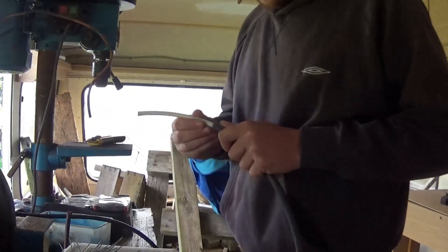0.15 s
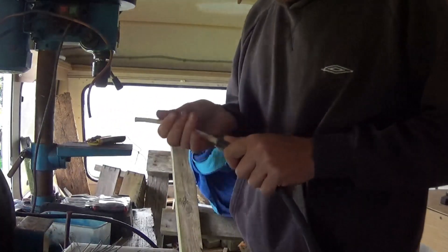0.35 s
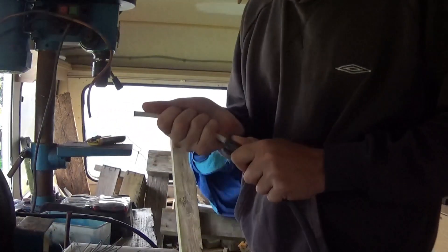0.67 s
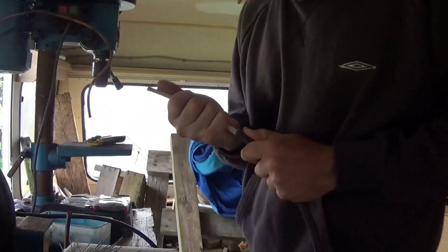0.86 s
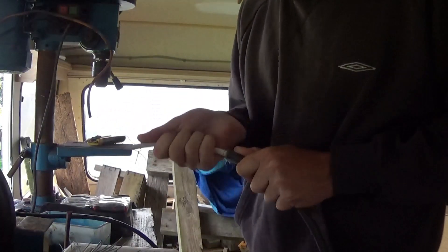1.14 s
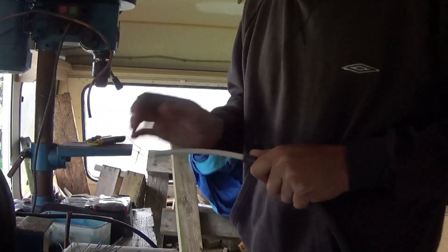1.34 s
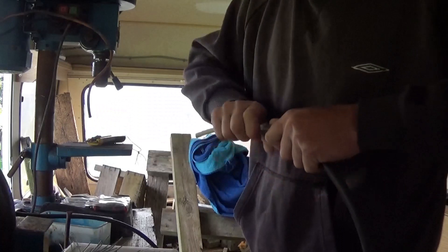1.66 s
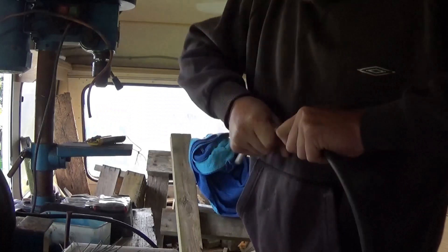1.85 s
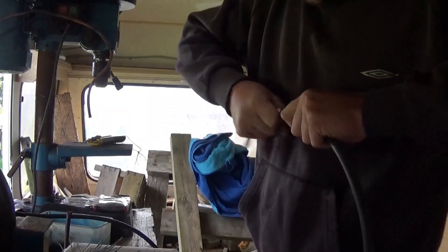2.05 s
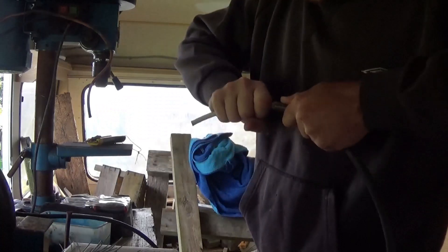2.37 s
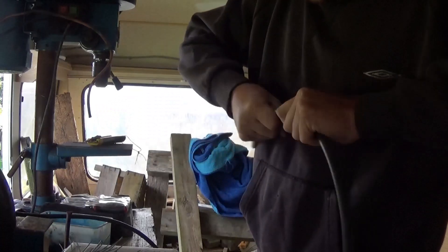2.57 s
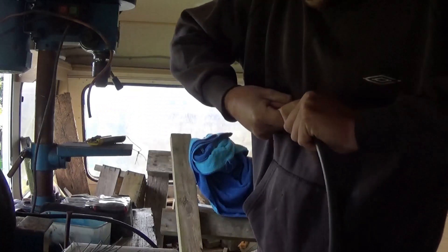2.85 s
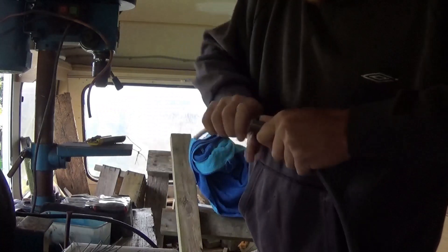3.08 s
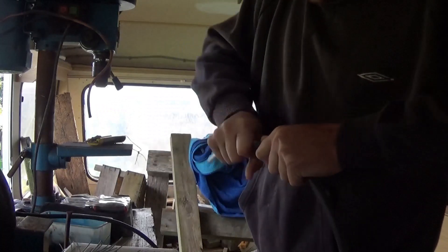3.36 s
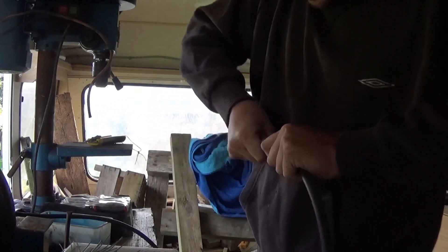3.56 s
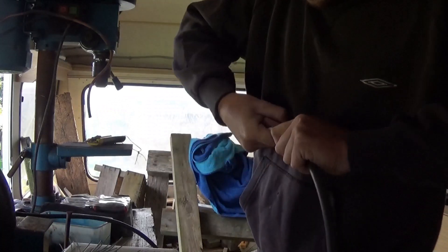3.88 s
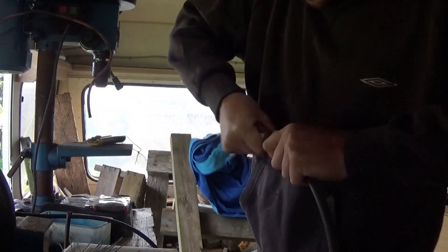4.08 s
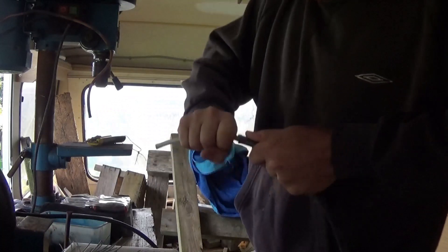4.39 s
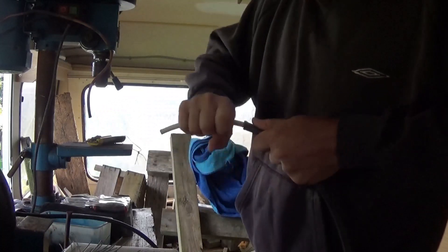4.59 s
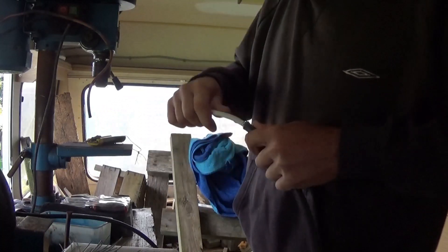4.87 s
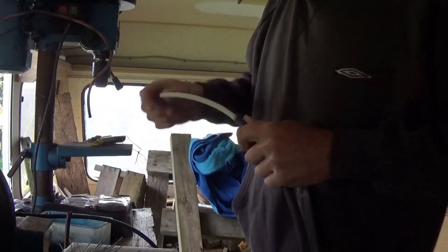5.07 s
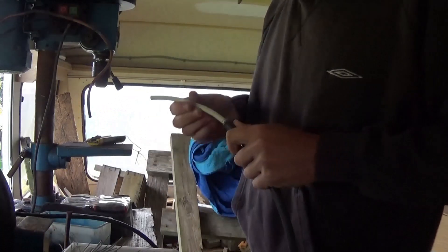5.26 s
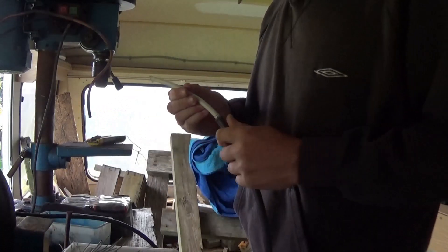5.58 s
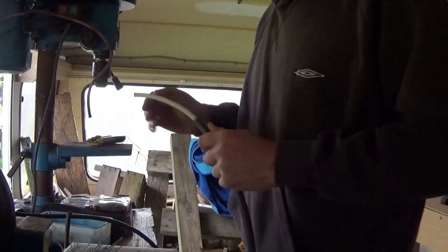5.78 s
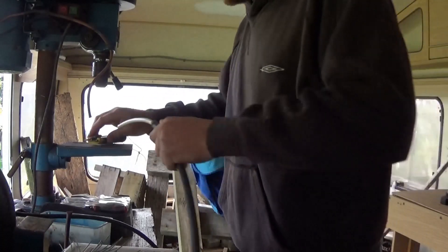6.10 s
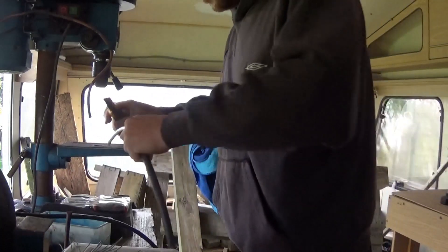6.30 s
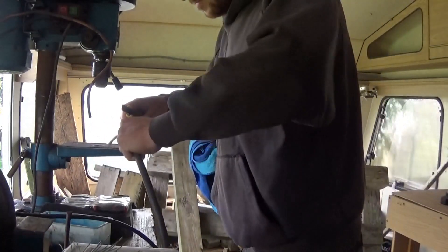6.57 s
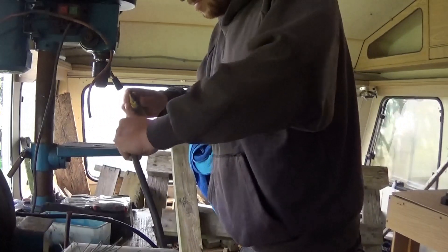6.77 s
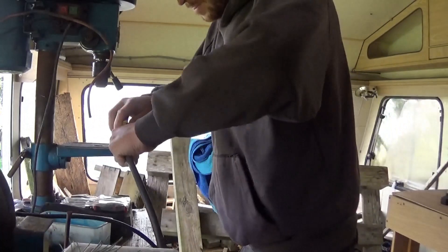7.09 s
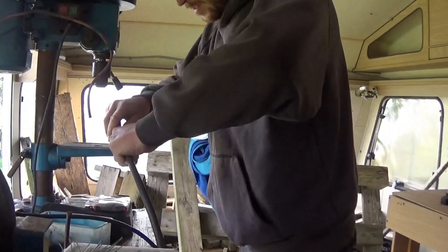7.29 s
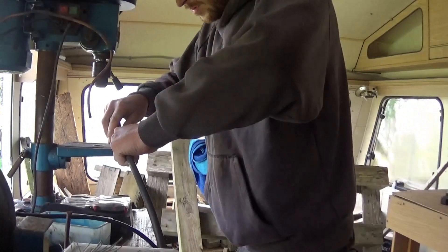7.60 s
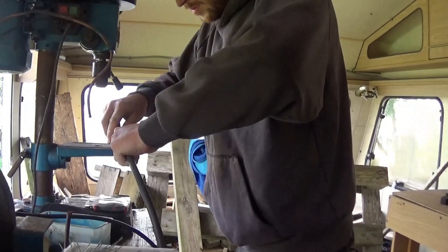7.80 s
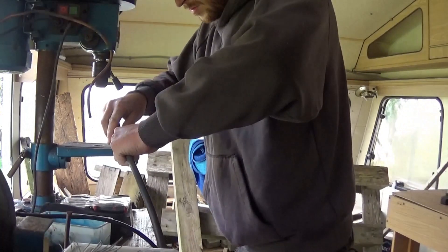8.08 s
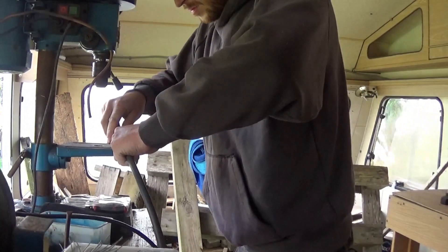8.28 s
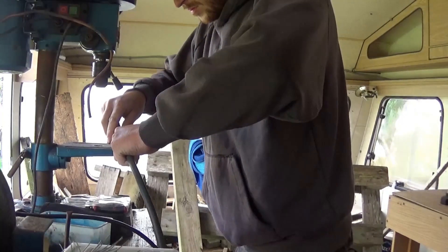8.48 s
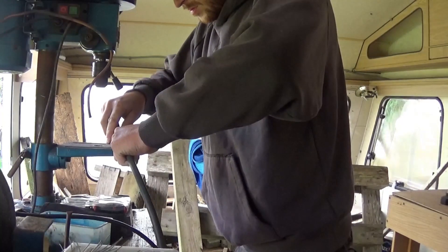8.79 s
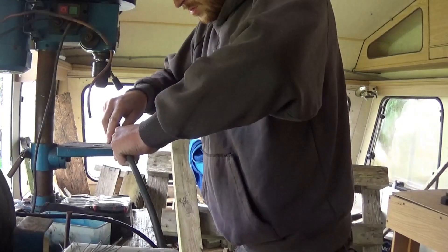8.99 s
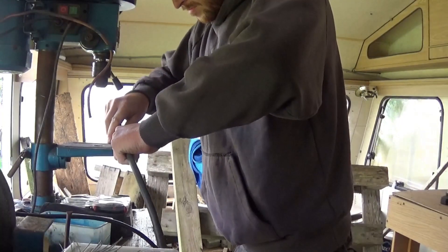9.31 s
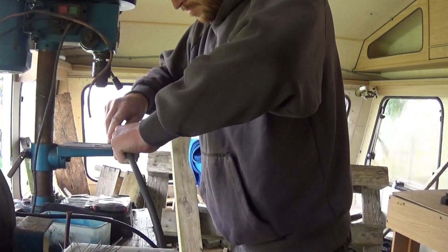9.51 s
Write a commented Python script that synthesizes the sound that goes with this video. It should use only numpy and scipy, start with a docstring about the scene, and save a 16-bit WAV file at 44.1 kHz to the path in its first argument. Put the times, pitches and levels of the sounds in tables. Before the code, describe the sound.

Close dry ratchet clicks, plastic ticks and cloth rustle, woody knocks, a metal tool scraping off a steel table, then sparse scratchy clicks and buzzy chips.

```python
"""Stiff cable worked by hand in a small wooden cabin.

A blade slider ratchets; the sheath ticks and snaps; sleeves and fingers rub; the cable drags over and slaps
the woodwork; a steel tool slides off a machine table; scratchy clicks ring, some around the tool's stutter,
later ones like a nail on the cable end. Contacts are impulses and noise through resonances, friction is
gritty noise. Through the open door come a buzzing small bird and a dove (swept sines), a far engine (two
sines) and outdoor hush (noise)."""
import sys
import numpy as np
from scipy import signal
from scipy.fft import rfft, irfft, next_fast_len
from scipy.io import wavfile
from scipy.ndimage import map_coordinates

SR = 44100
rng = np.random.default_rng(int(sys.argv[2]) if len(sys.argv) > 2 else 0)


def linear_from_db(decibels):
    """Turn decibels (scalar or array-like) into linear amplitude factors; 0 gives 1."""
    return 10 ** (np.asarray(decibels, float) / 20)


def put_to_file(sound):
    """Save the sound as 16-bit audio at rate SR, in the file named by the first command-line argument."""
    columns = np.atleast_2d(sound).T  # one column per channel
    safe = np.clip(columns, -1, 1)
    whole_steps = np.round(safe * 32767)
    wavfile.write(sys.argv[1], SR, whole_steps.astype(np.int16))


N = 425565
T = np.arange(N) / SR


def unit(x):
    """Scales to rms 1."""
    return x / np.sqrt(np.mean(x ** 2) + 1e-20)


def along(points, hz):
    """Interpolates (Hz, value) points on a log-frequency axis."""
    f, v = np.transpose(points)
    return np.interp(np.log(hz + 1), np.log(f + 1), v)


def curves(rows):
    """Interpolates each column after the time to one value per sample."""
    s, *cols = np.transpose(rows)
    return [np.interp(T, s, c) for c in cols]


def wobble(rate):
    """Smooth random curve, rate knots per second."""
    return map_coordinates(rng.standard_normal(int(N * rate / SR) + 4), [T * rate])


def filtered(x, response):
    """Applies a complex frequency response."""
    m = next_fast_len(x.shape[-1] + 8192)
    spectrum = rfft(x, m) * response(np.fft.rfftfreq(m, 1 / SR))
    return irfft(spectrum, m)[..., :x.shape[-1]]


def body(modes):
    """Causal response of (Hz, width Hz, dB) resonances summed with alternating sign."""
    def response(f):
        return sum((-1) ** k * linear_from_db(db) * 1j * f * w / (c * c - f * f + 1j * f * w)
                   for k, (c, w, db) in enumerate(modes))
    return response


def add(track, s, sound, db):
    """Lays a sound on a track at a given peak level."""
    part = track[..., round(s * SR):][..., :len(sound)]
    part += linear_from_db(db) * (sound / np.abs(sound).max())[:part.shape[-1]]


def gritty(rate, depth_db):
    """Noise whose size jumps about within bounds, as surfaces catch and let go."""
    return unit(rng.standard_normal(N) * linear_from_db(depth_db * np.clip(wobble(rate), -2, 2)))


def crackle(per_s, spread_db):
    """Sparse grains of uneven size."""
    present = rng.random(N) < per_s / SR
    size = linear_from_db(spread_db * np.minimum(rng.exponential(size=N), 2.5))
    return unit(present * size * rng.standard_normal(N))


def strokes(rows):
    """Gain of strokes that climb 10 dB per rise time and drop 10 dB per fall time; powers add."""
    power = sum(linear_from_db(2 * db - 20 * np.maximum((s - T) / rise, (T - s) / fall)) for s, rise, fall, db in rows)
    return np.sqrt(power)


def wide(pair, spread):
    """Mixes two unrelated sounds towards the left-right likeness of diffuse sound."""
    # (frequency [Hz], left-right likeness at spread 1 [-1..1])
    likeness = [(60, 0.95), (330, 0.89), (810, 0.36), (2990, 0.057), (11000, 0.59)]

    def split(hz):
        angle = spread * np.arccos(np.clip(along(likeness, hz), -1, 1)) / 2
        return np.array([np.cos(angle), np.sin(angle)])
    mid, side = filtered(pair, split)
    return np.array([mid + side, mid - side])


def ratchet():
    """Slider jumps tooth by tooth, slower and slower; each tooth snaps and rattles the housing."""
    # slider housing resonances: (frequency [Hz], width [Hz], level [dB])
    housing = [(480, 520, -4), (1120, 490, 1.5), (1950, 460, 2), (2640, 950, 4.5), (3240, 960, 3),
               (5840, 510, -6), (8640, 1340, -8.5)]
    # housing boom as the slider frees: (frequency [Hz], width [Hz], level [dB])
    boom = [(1114, 47, 0)]
    # slider breaks free: (time [s])
    latch_s = (0.0618, 0.0651)
    # single teeth: (time [s])
    single_s = [0.1487, 0.168, 0.197, 0.2276, 0.2712, 0.3159, 0.3776, 0.4674]
    latch_db, first_tooth_db, tire_db_per_s = -16.5, -16.5, 7
    whirr_last_gap_s, whirr_shrink, whirr_db = 0.01, 0.88, -23  # shrink: each earlier gap against the next
    wall_s, wall_db = 0.0042, -3  # a near surface repeats each tooth

    out, t = np.zeros(N), T[:1500]
    uneven = rng.standard_normal((12, 2))
    whirr_s = single_s[0] - np.cumsum(whirr_last_gap_s * whirr_shrink ** np.arange(len(uneven)))
    teeth = [(s, latch_db) for s in latch_s]
    teeth += [(s + 0.0005 * a, whirr_db + 0.54 * b) for s, (a, b) in zip(whirr_s, uneven)]
    teeth += [(s, first_tooth_db - tire_db_per_s * (s - single_s[0])) for s in single_s]
    for s, db in teeth:
        blow = (t == 0) + 0.11 * rng.standard_normal(len(t)) * linear_from_db(-60 * t / 0.019)
        blow = blow + linear_from_db(wall_db) * np.roll(blow, round(wall_s * SR))
        add(out, s, filtered(blow, body(housing)), db)
    add(out, latch_s[0], filtered(1. * (t == 0), body(boom)), -18)
    return out


def ticks():
    """Short contacts ring the sheath, each at its own balance; louder ones have shorter blows."""
    # contacts: (time [s], treble level [dB], body against treble [dB], top against treble [dB])
    contacts = [(0.7586, -37, -9, -5), (0.846, -37, -11, -7), (0.873, -40.5, -11, -5),
                (0.955, -41.5, -11.5, -3), (1.572, -35, -14.5, -8), (1.643, -39, -36, -6),
                (2.0503, -39, -0.5, 4.5), (2.246, -45, -5.5, -12), (2.3007, -36.5, -9, -9),
                (2.3428, -36.5, -14, -6.5), (3.452, -29.5, -21.5, -9.5), (3.528, -17, -11, -2),
                (3.6802, -43, -4, -18), (3.917, -40.5, -9, -1), (4.356, -38, -9, -7),
                (4.3903, -38, -14, -10), (4.462, -45, -3, -11), (4.497, -41.5, -8, -3.5),
                (4.573, -39, -7, 1), (5.073, -42.5, -12, 0.5), (5.4602, -46.5, -2, 3),
                (5.506, -42.5, -5, -2.5), (5.6567, -45.5, -9, 1.5), (5.8086, -39.5, -11, -1.5),
                (2.7636, -47, -2, 2), (2.866, -46, -8, 2.5), (2.9231, -52, -22, 7),
                (7.0798, -31, -4.5, -7.5), (3.517, -40, -26, 1)]
    # sheath resonances before each contact's balance: (frequency [Hz], width [Hz], level [dB])
    sheath = [(1700, 500, 7), (2850, 600, 7), (4450, 1100, 4), (5800, 1300, -1), (7200, 1300, 1),
              (8700, 1500, 5), (10200, 1400, 3)]
    lowest_db = -6  # lowest resonance against the rest of the body
    ring_db, crack_db = -2.5, 4

    out, t = np.zeros(N), T[:3000]
    for s, db, body_db, top_db in contacts:
        balance = np.array([body_db + lowest_db, body_db, body_db / 2, 0, 0, top_db, top_db])
        mode_db = balance + np.transpose(sheath)[2]
        peak_db = db + mode_db.max()
        u = t / (0.0034 * linear_from_db(-0.25 * (peak_db + 46)))
        blow = rng.standard_normal(len(t)) * u ** 1.15 * np.exp(-u)
        modes = [(c * (1 + rng.normal(0, 1 / 30)), w, d) for (c, w, _), d in zip(sheath, mode_db)]
        ring = filtered(blow, body(modes))
        ring = filtered(ring, body([(c, 2 * w, 0) for c, w, _ in modes]))  # steep skirts
        add(out, s, ring, peak_db + ring_db)
        crack = (t == 0) + 0.24 * rng.standard_normal(len(t)) * np.exp(-t / 0.0012)
        crack = filtered(crack, body([(c, 1.2 * w, d) for c, w, d in modes]))
        add(out, s, crack, peak_db + crack_db)
    return out


def handling():
    """Cloth rustles in the treble, skin scrapes on the sheath, the cable drags in jerks over the boards."""
    # rubs: (peak time [s], rise per 10 dB [s], fall per 10 dB [s], scrape [dB], rustle against scrape [dB])
    rubs = [(1.241, 0.034, 0.037, -57, 13), (1.95, 0.031, 0.093, -52.5, 3.5), (2.059, 0.037, 0.015, -48, 5),
            (2.528, 0.058, 0.02, -52, -1), (2.8, 0.17, 0.16, -45, -5), (4.57, 0.27, 0.14, -55.5, -5),
            (4.76, 0.24, 0.016, -59.5, 8.5), (5.06, 0.22, 0.11, -57.5, 2.5), (5.6, 1, 0.98, -61, -2.5),
            (6.14, 0.091, 0.25, -52.5, 2.5), (6.42, 0.1, 0.081, -39.5, -6.5),
            (6.65, 0.067, 0.055, -38, -0.5), (7.03, 0.29, 0.3, -50, -1.5)]
    # cable jerks: (peak time [s], rise per 10 dB [s], fall per 10 dB [s], level [dB])
    jerks = [(2.0, 0.04, 0.083, -44), (2.06, 0.026, 0.033, -38.5), (2.55, 0.062, 0.029, -44.5),
             (2.68, 0.047, 0.042, -42.5), (2.78, 0.054, 0.011, -31), (2.87, 0.13, 0.031, -38.5),
             (3.1, .03, .04, -49.5), (3.22, 0.074, 0.012, -52), (6.54, 0.23, 0.094, -50),
             (6.73, .1, 0.036, -52), (6.86, 0.026, 0.048, -53.5), (7.12, 0.13, 0.13, -56.5)]
    # boards under the cable: (frequency [Hz], width [Hz], level [dB])
    boards = [(238, 34, 6.5), (360, 88, 0.5), (428.5, 12, 3), (553, 50, -2.5), (818, 60, -6.5),
              (1090, 92, -12)]
    # cloth spectrum: (frequency [Hz], relative density [dB per Hz])
    cloth = [(3000, -17), (5000, -9), (8500, 2), (11000, -6.5)]
    # skin spectrum: (frequency [Hz], relative density [dB per Hz])
    skin = [(60, -11), (500, -6.5), (1050, -5.5), (3000, -7.5), (4800, -11), (7000, -16)]

    rustle = gritty(400, depth_db=3.5) + linear_from_db(-28) * crackle(130, spread_db=15)
    rustle = unit(filtered(rustle, lambda f: linear_from_db(along(cloth, f))))
    scrape = gritty(300, depth_db=4.0) + linear_from_db(-16) * crackle(150, spread_db=-0.5)
    scrape = unit(filtered(scrape, lambda f: linear_from_db(along(skin, f))))
    thin_boards = lambda f: 1 / (1 + (150 / (f + 1)) ** 3)  # small boards radiate no deep bass
    drag = unit(filtered(gritty(45, depth_db=2.5), lambda f: thin_boards(f) * body(boards)(f)))
    rustle_gain = strokes([(s, rise, fall, db + over_db) for s, rise, fall, db, over_db in rubs])
    scrape_gain = strokes([row[:4] for row in rubs])
    return rustle_gain * rustle + scrape_gain * scrape + strokes(jerks) * drag


def slaps():
    """A blow on the wood travels as a bending wave over several paths: treble arrives first, bass later."""
    # slaps: (time [s], peak level [dB], hardness [dB])
    hits = [(3.017, -17, -5.5), (3.498, -35.5, -19), (4.143, -23, -13.5), (4.727, -25.5, -13),
            (6.155, -36.5, -56), (6.193, -19.5, -16), (6.444, -27.5, -10), (7.042, -34, -12),
            (7.088, -32, 3)]
    # wooden panels: (frequency [Hz], width [Hz], level [dB])
    panels = [(336, 106, -1.5), (656, 152, 2.5), (756, 400, 0), (1250, 460, -4), (1760, 670, -7.5),
              (2940, 9200, -23.5)]

    out, t = np.zeros(N), T[:6000]
    for s, db, hard_db in hits:
        blow = 9 * (t == 0) + rng.standard_normal(len(t)) * linear_from_db(-60 * (t / 0.052) ** 3)
        treble = [(700, 0), (2000, hard_db + 0.5), (5000, 1.5 * hard_db - 4)]

        def wood(f):
            highpass = 1j * f / (100 + 1j * f)
            bending_lag = np.exp(-2j * np.pi * 0.1027 * np.sqrt(f))
            return highpass * bending_lag * linear_from_db(along(treble, f)) * body(panels)(f)
        add(out, s, filtered(blow, wood), db)
    return out


def tool():
    """A steel tool clinks, stutters and slides on the machine table; soft touches leave upper modes quiet."""
    # clinks: (time [s], peak level [dB], hardness [dB per octave])
    clinks = [(6.108, -46, 12), (6.352, -29, -4), (6.41, -31, 2), (6.624, -38, 7), (6.839, -28, 1),
              (7.04, -36.5, 2)]
    # steel modes: (frequency [Hz], level before hardness [dB], t60 when struck [s])
    steel = [(1037, 12.5, 0.18), (1190, 6.5, 0.099), (1396, 8, 0.23), (2054, -0.5, 0.12), (2320, -9, 0.15),
             (3750, -7, 0.15), (5060, -4.5, 0.15)]
    # stutters of the dragged tool: (time [s])
    stutter_s = [6.333, 6.354, 6.3804, 6.3964, 6.408, 6.43, 6.448, 6.466, 6.481]
    # stutter resonances: (frequency [Hz], width [Hz], level [dB])
    stutter_modes = [(3120, 440, -1), (5820, 200, 5.5), (8900, 1900, -2)]
    # slides: (peak time [s], rise per 10 dB [s], fall per 10 dB [s], level [dB])
    slides = [(6.44, .1, 0.13, -43), (6.66, 0.044, 0.08, -47), (6.8, .1, .05, -67),
              (6.95, 0.094, 0.063, -50)]

    out, t = np.zeros(N), T[:SR // 2]
    for s, db, hard_db in clinks:
        ring = sum(linear_from_db(g + hard_db * np.log2(hz / steel[0][0]) - 60 * t / t60) * np.sin(2 * np.pi * hz * t)
                   for hz, g, t60 in steel)
        grain = np.abs(rng.standard_normal(300)) ** 3 * np.sign(rng.standard_normal(300))
        chatter = grain * linear_from_db(-60 * t[:300] / 0.031)  # scuffing contact
        add(out, s, signal.fftconvolve(ring, chatter), db)
    for s in stutter_s:
        burst = rng.standard_normal(600) * linear_from_db(-60 * t[:600] / 0.0067)
        add(out, s, filtered(burst, body(stutter_modes)), -26 + 2 * rng.standard_normal())
    sung = body([(hz, 1.9 / t60 + 12, g) for hz, g, t60 in steel])  # widths from decay, plus 12 Hz
    return out + strokes(slides) * unit(filtered(gritty(120, depth_db=2.5), sung))


def scratchy_clicks():
    """Noise bursts ring resonances: some around the tool's stutter, later ones like a nail on the cable end."""
    # clicks: (time [s], peak level [dB], treble [dB], lowest ring [Hz])
    clicks = [(6.308, -23, 2, 2510), (6.542, -29, -16, 2600), (6.811, -37.5, -24, 2580),
              (7.2183, -35, -21, 1440), (7.456, -37, 3.5, 1800), (7.7847, -36, -5, 1800),
              (8.3539, -18.5, 1, 1560), (8.7406, -32, -8.5, 1780), (9.189, -46, -3, 1500)]
    # upper rings: (frequency [Hz], width [Hz], level before treble [dB])
    upper = [(2980, 240, 7), (3730, 490, -2), (6230, 630, 0), (7440, 450, 6), (9800, 1400, -12.5)]

    out, t = np.zeros(N), T[:3000]
    for s, db, treble_db, low_hz in clicks:
        blow = rng.standard_normal(len(t)) * t * np.exp(-t / 0.003)
        modes = [(low_hz, 420, 3)] + [(c, w, d + treble_db * (c > 5000)) for c, w, d in upper]
        ring = filtered(blow, body(modes))
        add(out, s, filtered(ring, body([(c, 2 * w, 0) for c, w, _ in modes])), db)  # steep skirts
    return out


def bird():
    """Buzzy chip: a whistle rising to a ceiling, shaken in pitch and level a few hundred times a second."""
    # calls: (time, 8 ms after onset [s])
    calls = [0.547, 0.72, 0.922, 1.585, 2.452, 3.264, 3.712, 3.794, 3.957, 4.206, 4.535, 4.996, 5.444,
             5.875, 6.896, 7.181, 7.596, 7.905, 8.153, 8.492, 8.711, 8.795, 8.975, 9.135, 9.406]

    out, t = np.zeros(N), T[:4000]
    for s in calls:
        vary = rng.standard_normal(3)
        buzz = 2 * np.pi * 270 * (1 + 0.081 * vary[0]) * t + vary[1]
        dip_hz = (1300 * np.exp(-t / 0.0215) + 500) * (1 - np.sin(buzz)) / 2
        hz = 7250 - dip_hz - 500 * np.exp(-t / 0.00977)
        shape = (t / 0.016) ** 0.5 * np.exp(-(t / 0.019) ** 1.3) * (1 + 0.5 * np.sin(buzz))
        add(out, s - 0.008, shape * np.sin(2 * np.pi * np.cumsum(hz) / SR), -47 + vary[2])
    return out


def dove():
    """Soft coos: sines of gliding pitch and level."""
    # one list per coo: (time [s], frequency [Hz], relative level [dB])
    coos = [
        [(1.0, 515.2, -76), (1.216, 514, -70), (1.3, 507, -87)],
        [(1.68, 530, -82), (1.758, 519, -62.5), (2.0, 516, -64)],
    ]

    out = 0
    for coo in coos:
        hz, db = curves(coo)
        on = np.clip(np.minimum(T - coo[0][0], coo[-1][0] - T) / 0.04, 0, 1)
        out = out + on * linear_from_db(db + 3.5) * np.sin(2 * np.pi * np.cumsum(hz) / SR)
    return out


def engine():
    """Far engine: sines at the firing rate and its double, fading in."""
    # hum: (time [s], firing rate [Hz], relative first order [dB], relative second order [dB])
    hum = [(7.3, 81.6, -81, -67), (7.36, 81.7, -88, -80), (9.65, 82.3, -80, -83.5)]

    hz, first_db, second_db = curves(hum)
    phase = 2 * np.pi * np.cumsum(hz) / SR
    fade_in = np.clip((T - hum[0][0]) / 0.28, 0, 1)
    return fade_in * (linear_from_db(first_db + 15.5) * np.sin(phase) + linear_from_db(second_db + 4) * np.sin(2 * phase))


def air():
    """Outdoor hush and microphone hiss: wide shaped noise of slowly wavering level."""
    # spectrum: (frequency [Hz], relative density [dB per Hz])
    spectrum = [(15, -52), (25, -9), (94, -6.5), (545, -3.5), (668, 2), (740, -3), (3680, -6), (4750, -10),
                (6960, -8), (11000, -12.5), (14300, -122), (22000, -120)]
    # mean level: (time [s], level [dB])
    hush = [(0, -57.5), (4, -59), (7.4, -60), (9.65, -61)]

    noise = filtered(rng.standard_normal((2, N)), lambda f: linear_from_db(along(spectrum, f)))
    return linear_from_db(curves(hush)[0] + 1.22 * wobble(3.06)) * unit(wide(noise, spread=0.83))


def cabin(x, delay_s):
    """Walls answer; each frequency dies at its own speed and the paths drift as the body moves."""
    # decay: (frequency [Hz], t60 [s])
    decay = [(200, 0.26), (1500, 0.21), (5000, 0.19), (10000, 0.14)]

    out, step = np.zeros((2, N + SR)), SR // 8
    window = np.sin(np.pi * np.arange(2 * step) / (2 * step))
    for a in range(0, N, step):  # overlapping pieces, each with a fresh tail
        hz, t, z = signal.stft(rng.standard_normal((2, SR // 3)), SR, nperseg=256)
        fading = z * linear_from_db(-60 * t / along(decay, hz)[:, None])
        tail = wide(signal.istft(fading, SR, nperseg=256)[1], spread=0.74)
        piece = x[a:a + 2 * step] * window[:N - a]
        wet = signal.fftconvolve(piece[None], tail / np.linalg.norm(tail[0]), axes=1)
        out[:, a + round(delay_s * SR):][:, :wet.shape[1]] += wet
    return out[:, :N]


def scene():
    """Mixes close sources, partly direct, with wall echoes; the bird comes mostly by echoes."""
    # hands move across: (time [s], left over right [dB])
    hand_pan = [(4.6, -1), (5.0, 1)]

    teeth, steel, chips = ratchet(), tool(), bird()
    snaps = ticks() + scratchy_clicks()
    thuds, rubbing = slaps(), handling()
    pan_db, = curves(hand_pan)
    close = teeth + steel + snaps + thuds + rubbing
    direct = close * linear_from_db([pan_db / 2, -pan_db / 2]) + linear_from_db(-3) * chips
    echoed = linear_from_db(-5) * (teeth + snaps) + linear_from_db(-9.5) * thuds + linear_from_db(-4) * steel + linear_from_db(-3.5) * rubbing + chips
    return direct + cabin(echoed, delay_s=0.004) + dove() + engine() + air()


def band_limit(x):
    """A steep low-pass at the top of the band."""
    return signal.sosfilt(signal.butter(12, 11610, fs=SR, output="sos"), x)


def record(dry):
    """Small camera microphone: no deep bass, steep band limit."""
    def microphone(f):
        highpass = f ** 2 / (f ** 2 + 70 ** 2)
        return highpass / (1 + (f / 11100) ** 100)
    return band_limit(filtered(dry, microphone))


dry = scene()
out = record(dry)
put_to_file(out)
```